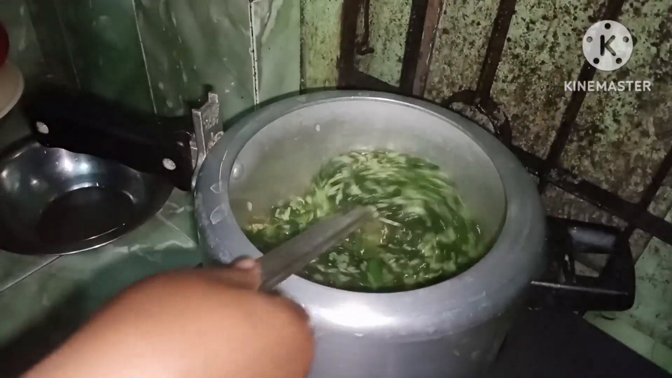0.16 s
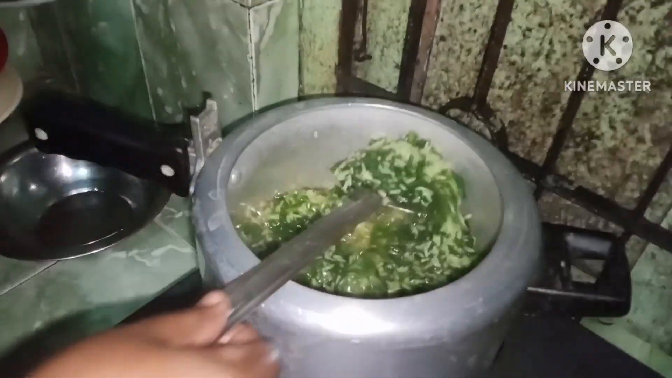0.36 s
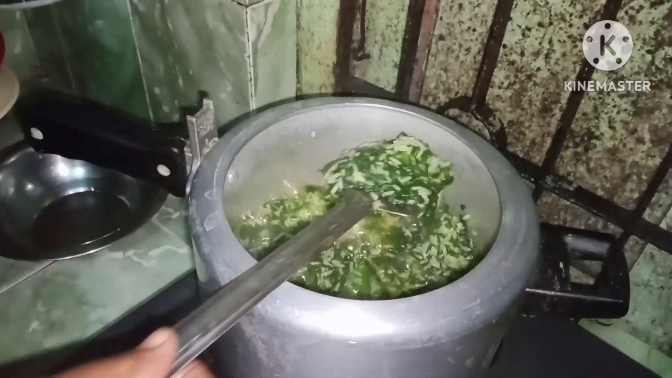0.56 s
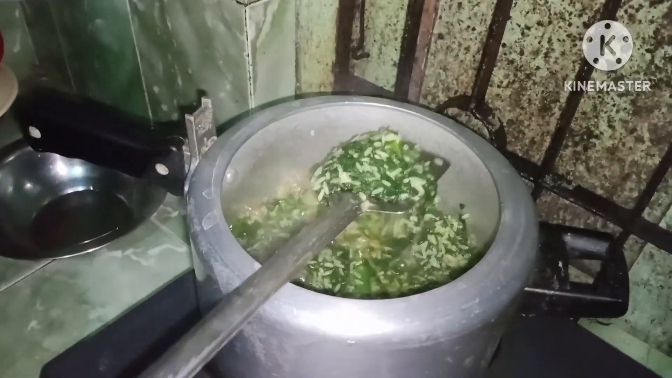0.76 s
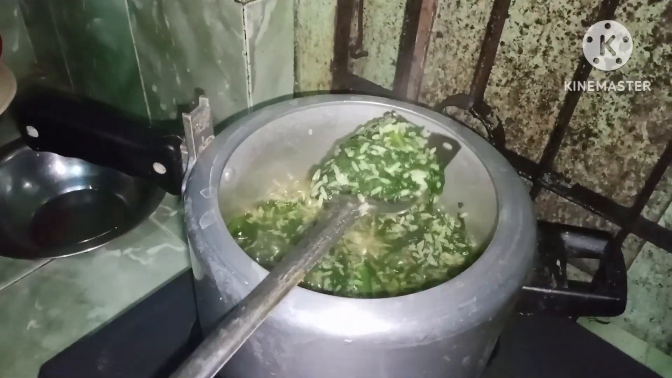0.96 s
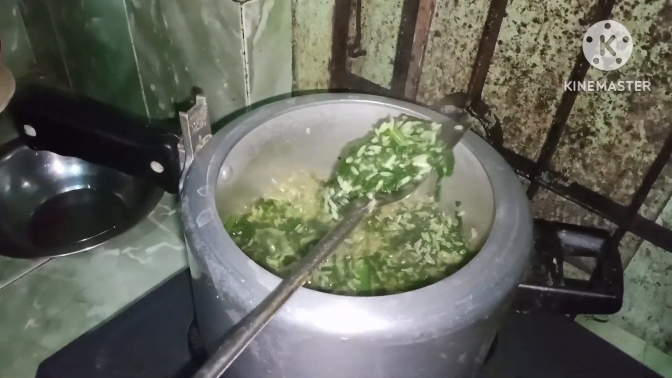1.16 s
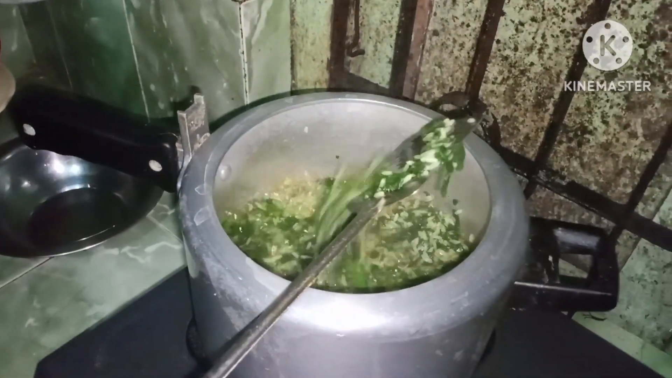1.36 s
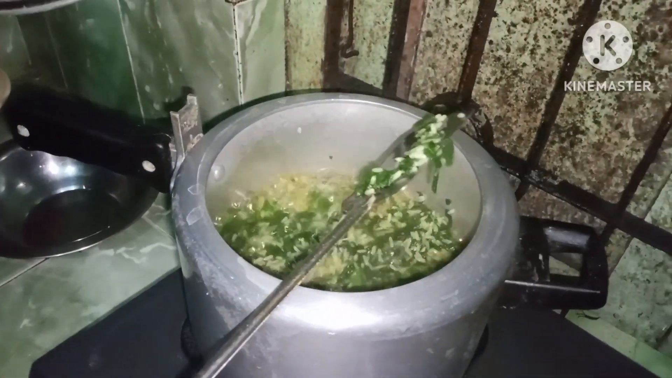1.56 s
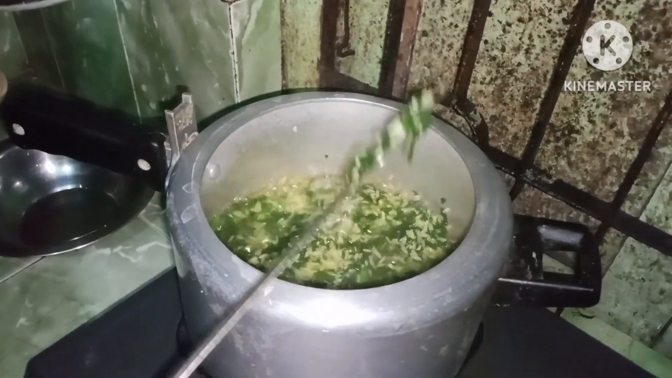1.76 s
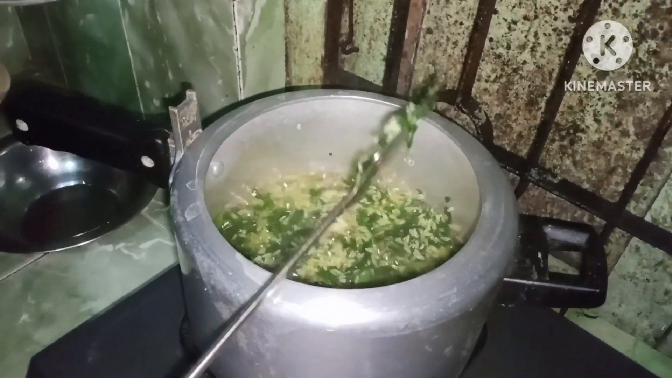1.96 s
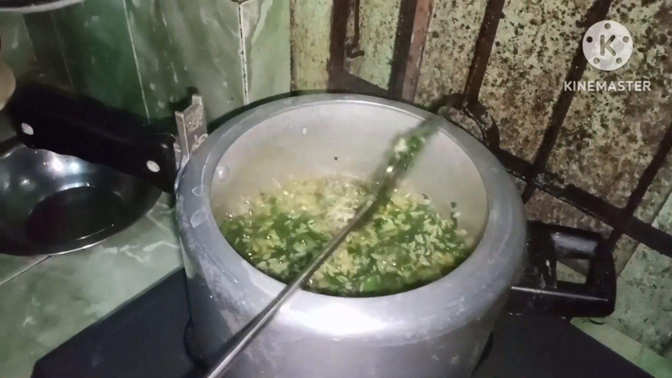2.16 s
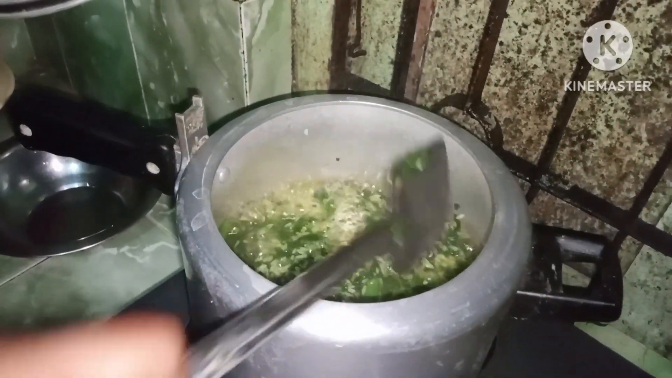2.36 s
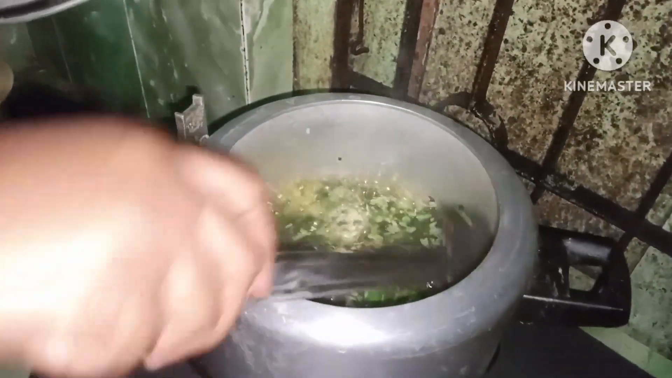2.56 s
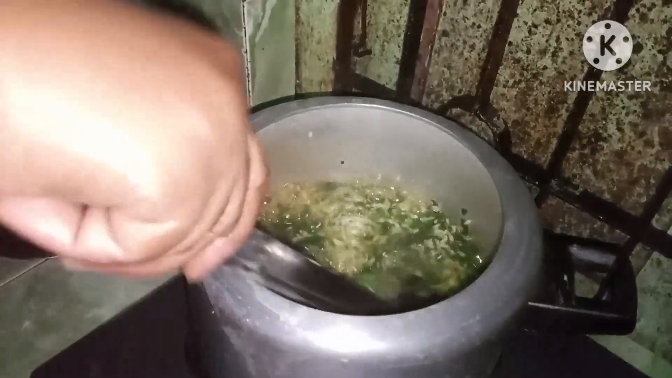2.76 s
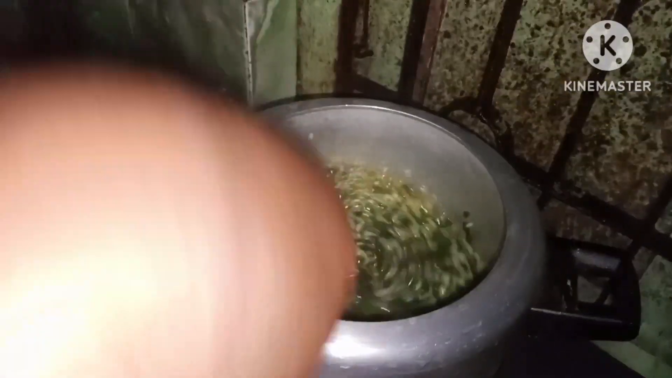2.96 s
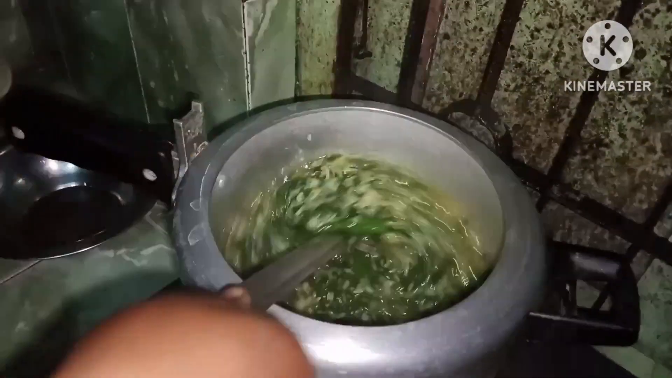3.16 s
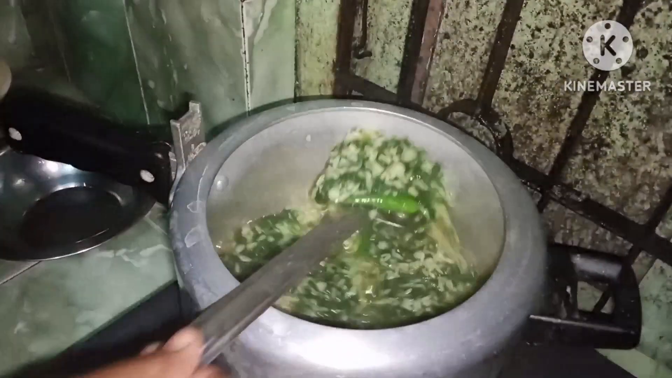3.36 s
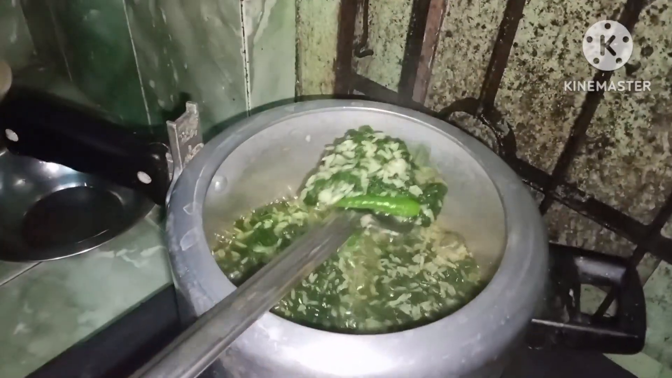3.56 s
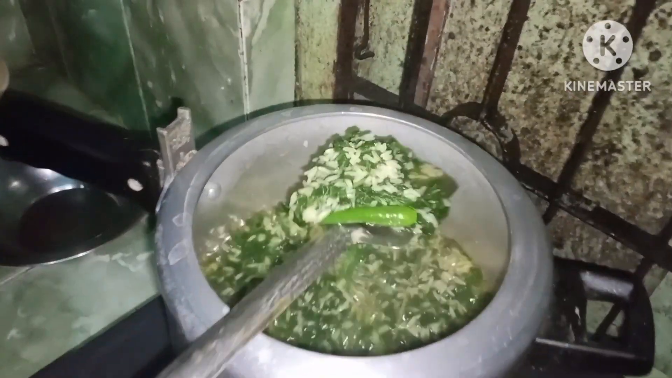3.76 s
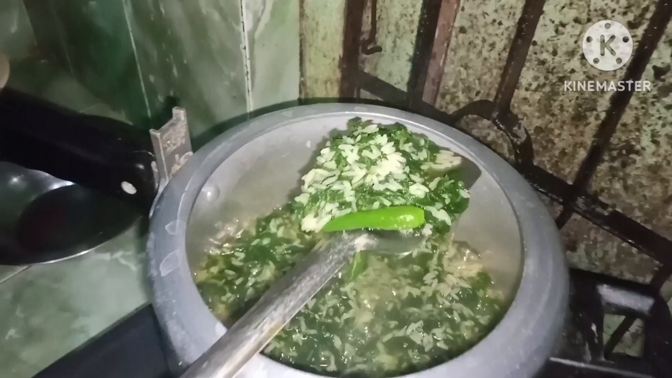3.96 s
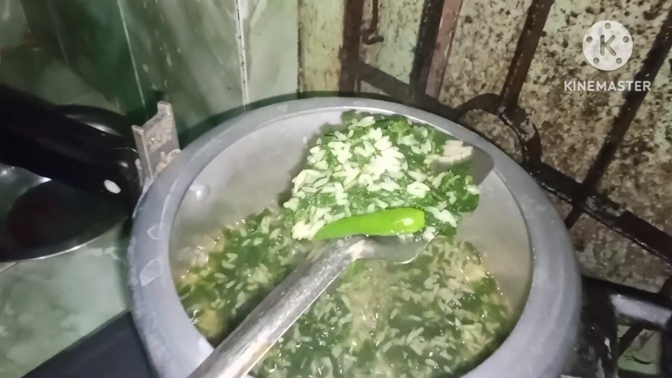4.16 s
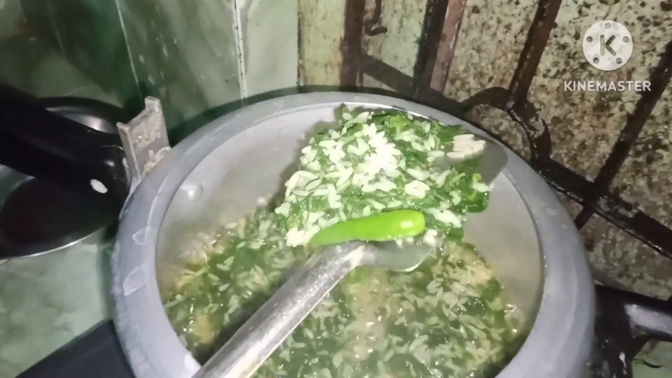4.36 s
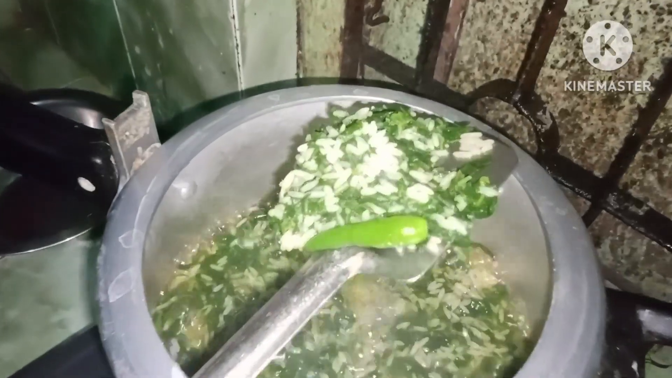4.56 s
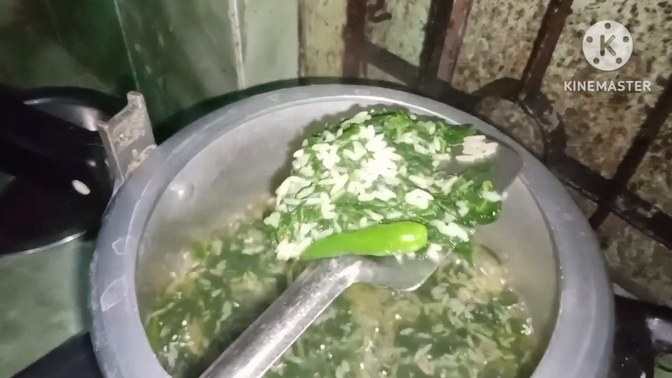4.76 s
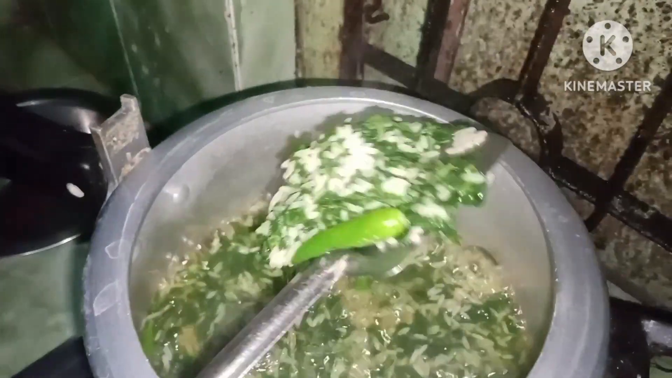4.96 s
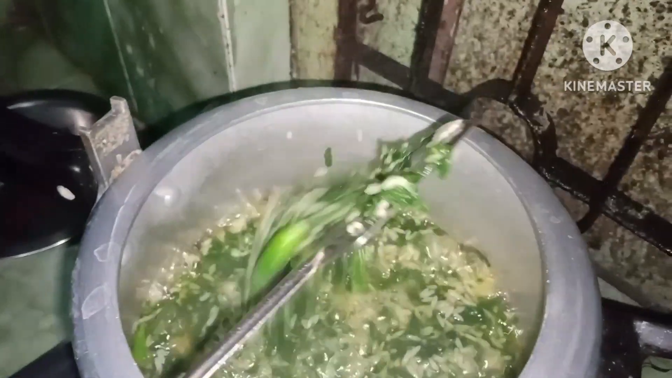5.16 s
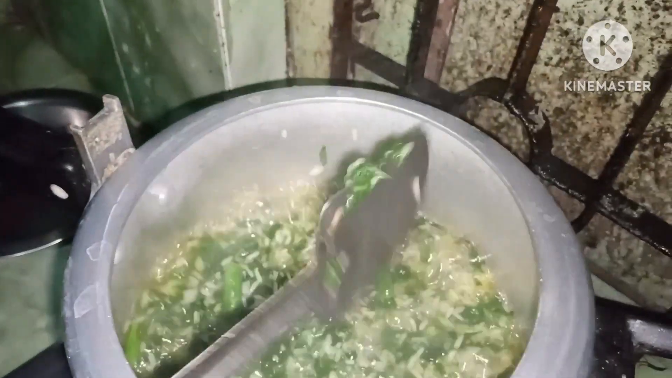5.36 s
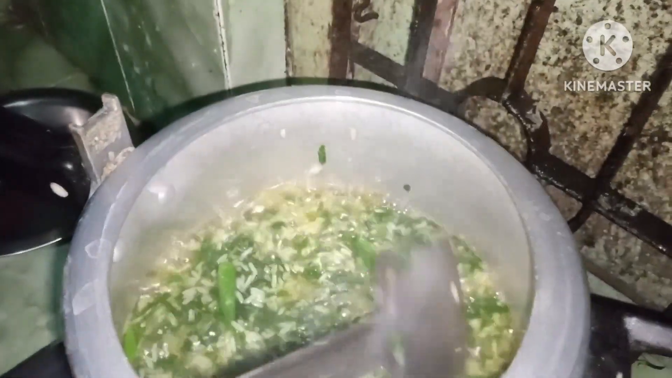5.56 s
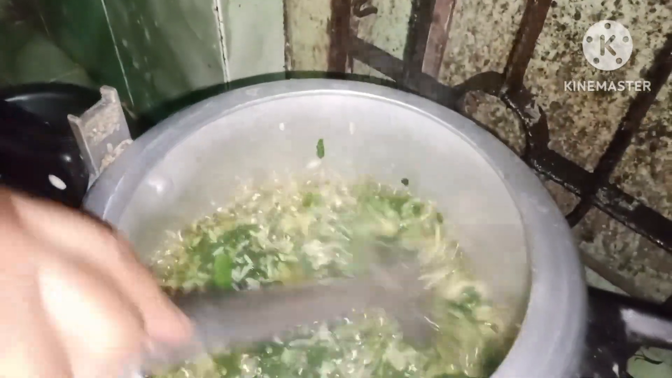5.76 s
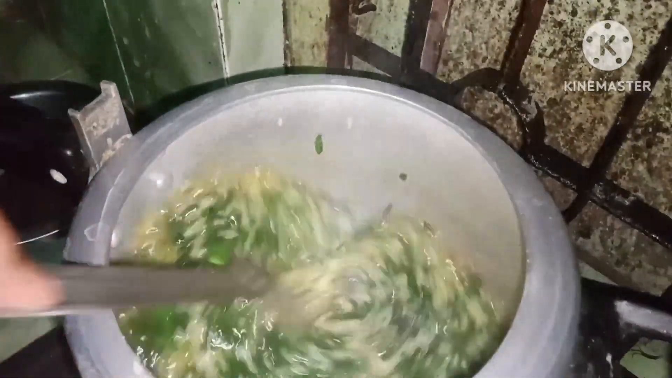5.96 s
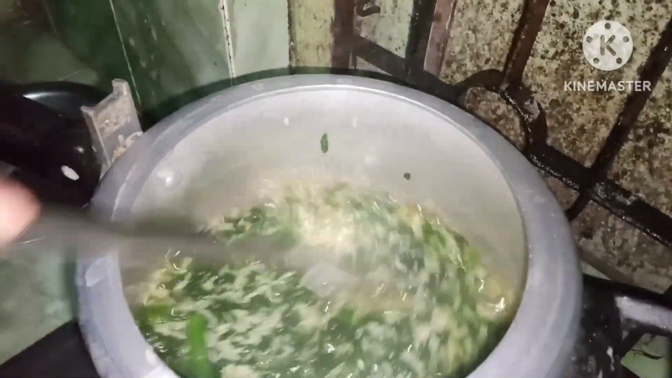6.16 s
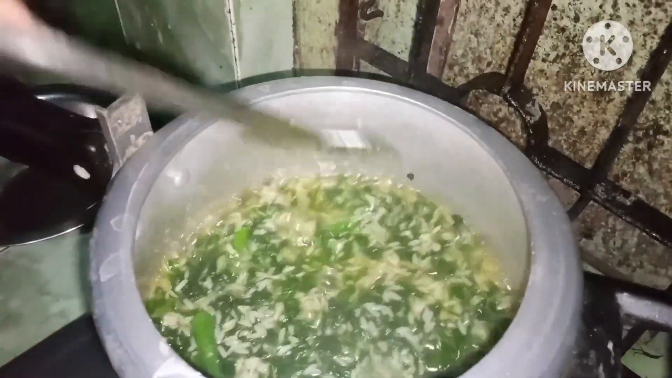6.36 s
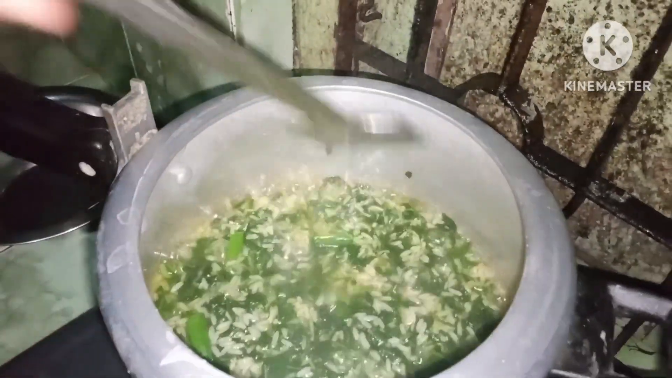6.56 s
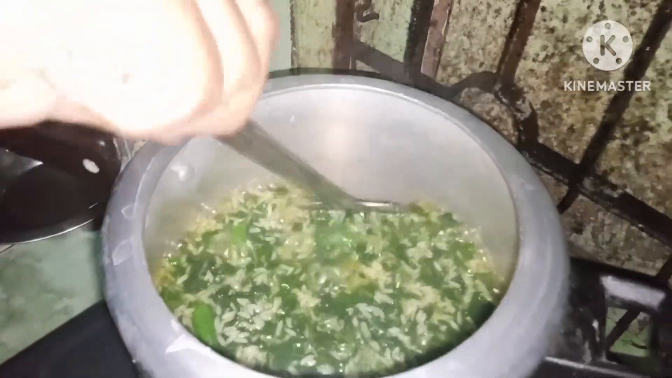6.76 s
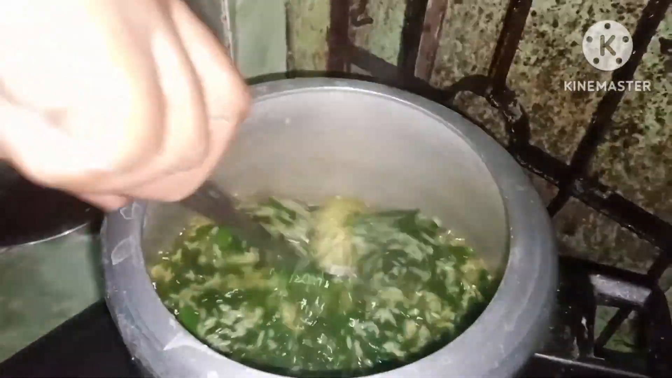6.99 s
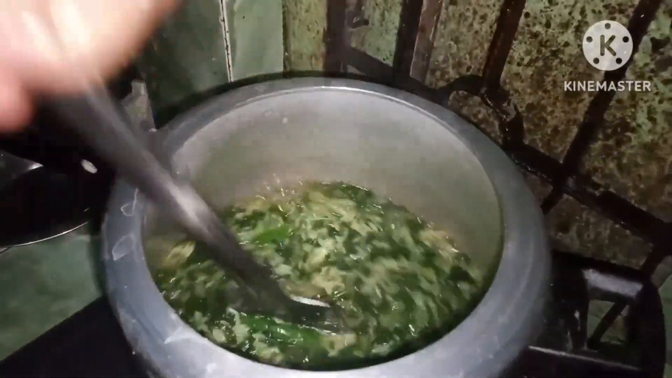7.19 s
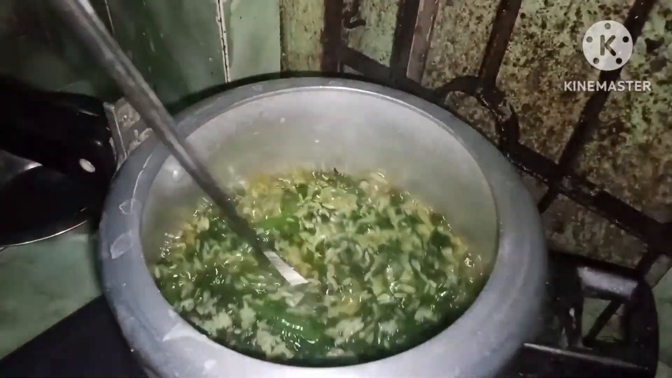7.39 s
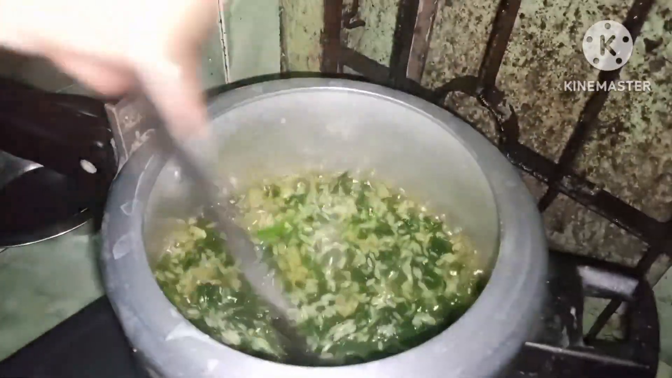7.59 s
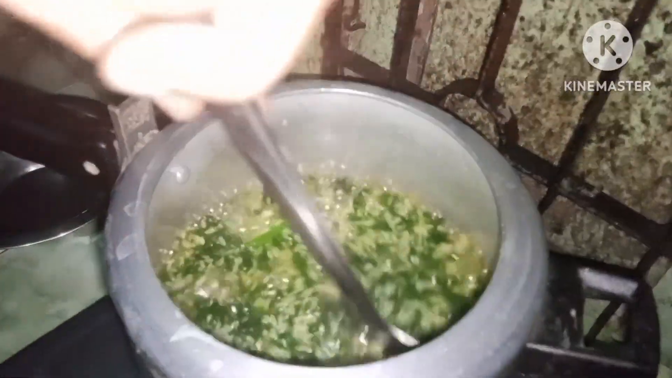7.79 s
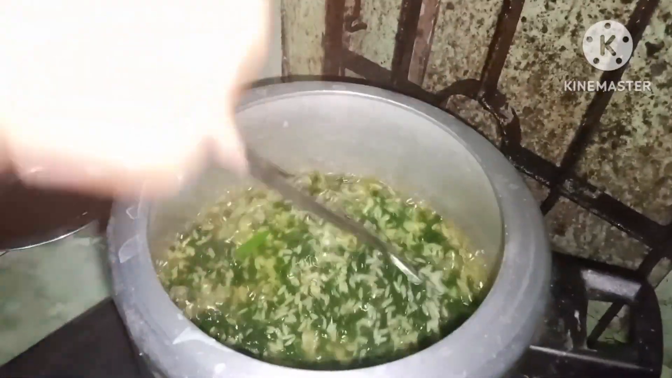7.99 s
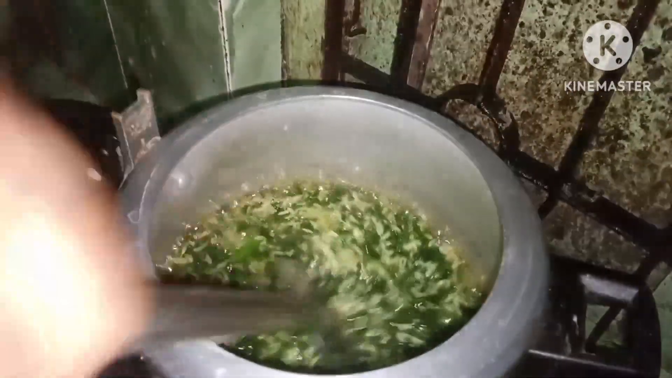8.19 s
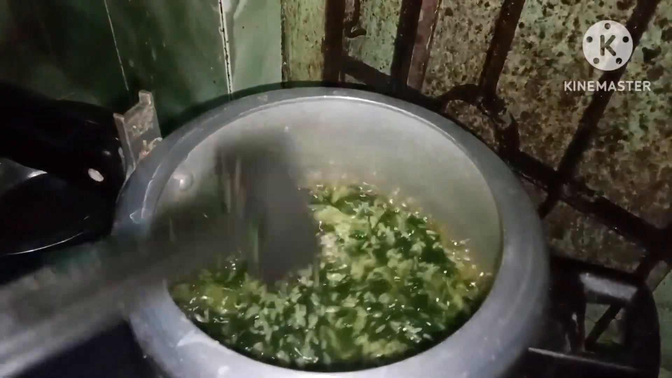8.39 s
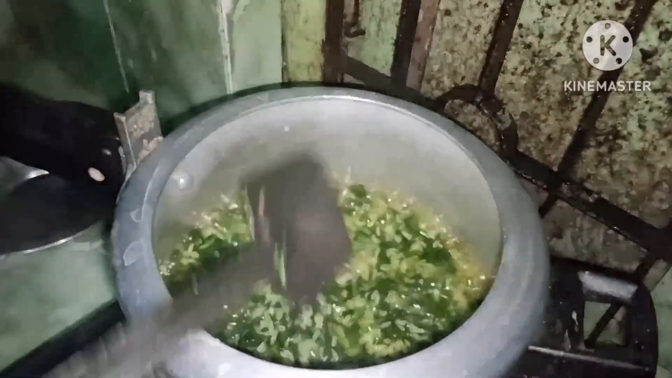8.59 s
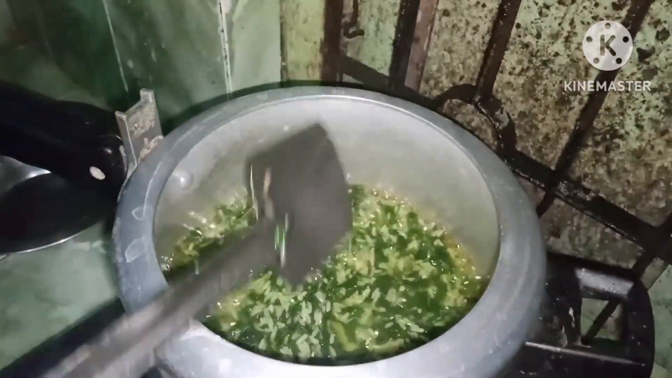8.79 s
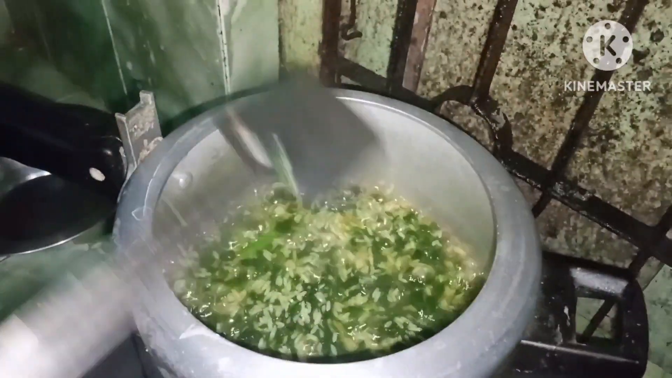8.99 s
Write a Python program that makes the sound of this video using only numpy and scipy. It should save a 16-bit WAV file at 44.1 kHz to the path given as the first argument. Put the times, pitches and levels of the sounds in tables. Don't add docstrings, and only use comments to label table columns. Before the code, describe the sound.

Thick broth simmers in a metal pot, with small wet pops and a faint even hiss, heard close on a phone with short metallic echoes. A spoon gives a low humming rub at first, later a sharp clank and rough scraping through the wet load. After a bubbling pause come lighter knocks and scrapes, then quiet boiling and one last ringing push.

```python
import sys
import numpy as np
from scipy import signal
from scipy.fft import rfft, irfft
from scipy.io import wavfile
from scipy.ndimage import uniform_filter1d

SR = 44100
rng = np.random.default_rng(int(sys.argv[2]) if len(sys.argv) > 2 else 0)


def materialize(psi):
    bounded = np.clip(np.atleast_2d(psi).T, -1, 1)
    quanta = np.round(bounded * 32767).astype(np.int16)
    wavfile.write(sys.argv[1], SR, quanta)


def voltage_ratio(level):
    return 10 ** (np.asarray(level, float) / 20)


N = 398223

# [t/s, peak level/dB, blade ring level/dB, time to fade by 60 dB/s, favoured f/Hz]
CLANK_BLOWS = [
    (2.2455, -6, -9, .1, 6150),
    (2.398, -24, -10, .09, 4657),
    (2.73, -14, -8, .12, 3712),
    (2.8, -12, -8, .1, 2600),
    (5.363, -16, -12, .08, 4657),
    (6.421, -27, -2, .08, 4081),
    (6.618, -14, -10, .09, 6395),
    (6.682, -14, -8, .07, 3712),
    (8.7385, -14, -14, .14, 4657),
]
# [f/Hz, width/Hz, level/dB]
FLOOR_HUM = [(298.2, 11.3, 0.5), (249, 62, -12.5), (152, 48, -21.5)]
# [f/Hz, width/Hz, level/dB]
WALL_DRAG = [(435.3, 21, 7), (831, 63, 3), (1227, 150, -3.5), (965, 34, -4), (542, 130, -5), (722, 89, 0.5)]
# [f/Hz, width/Hz, level/dB]
WALL_RASP = [(2015, 16, 9), (2360, 11, 7), (2680, 14, 2.5), (2970, 21, 5), (3340, 37, -5), (3707, 98, 5),
             (4020, 15, -5.5), (4390, 65, 7), (5560, 1100, -3.5)]
# [f/Hz, level per Hz/dB]
BRIGHT_EDGE = [(3240, -29.5), (5500, -9), (7080, -5.5), (8240, -11.5), (9860, -1.5), (13700, -12),
               (15100, -8), (16000, -4.5), (16500, -80.5)]
# [f/Hz, level/dB]
BLADE_NOTES = [(2030, -2), (2400, -7.5), (2600, -10), (3165, -2), (3712, 2), (4081, -3.5), (4657, -0.5),
               (5146, -20), (6150, -0.5), (6395, 1.5), (7095, -6), (7790, -16), (10300, -23),
               (11520, -26.5)]
# [f/Hz, width/Hz, level/dB]
POT_AIR = [(573, 78, -7), (1317.5, 120, 1.5), (1156, 32, -8.5), (1870, 45, -1.5), (2320, 350, -6.5),
           (2800, 250, -5.5), (3600, 400, -3.5), (4280, 110, -1)]
# [t/s, level/dB]
BOIL_LEVEL = [
    (0, -45.5),
    (0.5, -52.5),
    (1.2, -55),
    (3.1, -52),
    (4.3, -54.5),
    (5.5, -53),
    (6.4, -50.5),
    (9.03, -58),
]
# [f/Hz, level per Hz/dB]
STEAM_COLOUR = [(72, -36.5), (92, 1.5), (130, -10), (210, -8.5), (390, -10.5), (550, -11), (950, -14.5),
                (1330, -41), (1750, -30), (4200, -15.5), (5200, -22.5), (7150, -18), (8200, -35),
                (10300, -20.5), (13200, -41), (15200, -22.5)]
STEAM_DB, ECHO_DB = -61.5, -10
TOP_HZ = 15650

# [t/s, peak level/dB, bubble f/Hz]
SMALL_BLIPS = [(0.2948, -24.5, 3900), (0.739, -40, 2680), (0.9666, -36.5, 3580), (1.016, -30.5, 2680),
               (1.256, -32.5, 2590), (1.475, -26.5, 3870), (3.212, -22, 4070), (4.138, -34.5, 2720),
               (4.2195, -33.5, 2220), (4.2698, -35, 3100), (5.001, -37, 4100), (5.4, -17.5, 3010),
               (6.464, -24.5, 3600), (8.447, -33.5, 2200), (1.194, -35.5, 4130), (1.995, -37, 3830),
               (2.0733, -34, 2120), (2.0902, -31, 3550), (3.188, -32, 2360), (4.419, -36, 2150),
               (4.638, -34, 3630), (4.938, -37, 2290), (5.137, -37.5, 3340), (5.2087, -32, 2135),
               (5.551, -28, 3700), (5.673, -34.5, 2320), (5.756, -36, 3740), (6.2306, -29.5, 2390),
               (7.1072, -30.5, 2600), (7.3, -43, 2530), (7.602, -47, 2560), (7.815, -31.5, 2260),
               (8.0425, -34, 4560), (8.1889, -36, 2040), (8.345, -39.5, 2170), (8.711, -32, 3000)]
# [t/s, peak
# level/dB, bubble f/Hz, pot air level/dB, spray level/dB]
FULL_BURSTS = [(0.0777, -26, 1870, -36, -29), (0.476, -34, 8500, -37.5, -32), (2.2458, -6.5, 6180, -21, -8),
               (2.3989, -16, 4670, -29, -46), (2.5406, -39, 3800, -35.5, -32.5),
               (2.672, -24.5, 4290, -40, -38), (2.731, -18, 3700, -57, -11.5), (2.8, -9.5, 2570, -15, -21),
               (2.9044, -22.5, 1810, -15, -32.5), (3.959, -30, 3600, -38, -35.5),
               (5.3638, -13.5, 4140, -42, -12), (6.201, -47, 7100, -25, -22.5),
               (6.35, -31, 3500, -31.5, -47), (6.4225, -11.5, 4280, -29, -60),
               (6.6184, -26, 6100, -38, -14.5), (6.6831, -15.5, 3280, -54, -10.5),
               (7.5103, -17, 3760, -30, -18.5), (8.7391, -21.5, 4250, -35, -12)]
# [t/s, peak level/dB, bubble f/Hz, spray level/dB]
SPRAY_SPLASHES = [(0.2394, -24.5, 3500, -32.5), (0.8953, -28, 11900, -32.5), (1.5796, -18, 4280, -27),
                  (1.6058, -16, 5400, -19), (1.6516, -20.5, 7000, -23), (2.001, -36, 6700, -38),
                  (2.974, -14, 4300, -16), (3.332, -32, 5560, -29.5), (3.744, -28.5, 4420, -28),
                  (3.866, -33.5, 3600, -40.5), (4.3912, -42, 4220, -34), (4.516, -27, 4800, -33.5),
                  (5.5746, -23.5, 3530, -30.5), (5.82, -21, 3720, -29), (6.0302, -26, 2980, -34),
                  (6.1547, -27.5, 3800, -27.5), (7.026, -24.5, 5700, -33), (7.4744, -36, 7600, -21),
                  (7.7488, -17, 4300, -25.5), (8.406, -33.5, 9150, -40), (1.405, -42, 4100, -52),
                  (4.424, -55, 9000, -38.5), (6.0383, -33, 10100, -49), (6.051, -40, 9600, -24.5),
                  (6.271, -52, 10300, -39)]
# [t/s, peak level/dB, bubble f/Hz, pot air level/dB]
DEEP_BURSTS = [(1.214, -30.5, 3970, -54), (1.3817, -34, 1990, -39), (2.02, -29, 3340, -36.5),
               (2.1668, -21, 3340, -28.5), (3.225, -20.5, 2040, -57), (3.4235, -28.5, 3600, -43),
               (3.883, -23.5, 3600, -35), (4.004, -30, 3060, -40), (4.0226, -22.5, 3340, -24),
               (5.262, -32, 1874, -21.5), (5.646, -25, 2440, -48), (6.391, -27.5, 3600, -36),
               (6.482, -30.5, 1920, -26.5), (6.503, -18.5, 3900, -39), (7.3192, -21.5, 2360, -48),
               (7.367, -27, 4060, -41), (7.396, -30, 1770, -27.5), (7.45, -25.5, 3140, -32),
               (7.7383, -31, 3080, -36.5), (8.544, -45, 2870, -32), (8.557, -22.5, 2130, -24),
               (9.02, -30, 2200, -30)]
# [t/s, pot air level/dB]
LEAF_GULPS = [(3.731, -37), (5.055, -38.5), (5.5408, -29.5), (5.852, -33.5), (6.021, -36), (6.145, -31.5),
              (6.841, -24.5), (7.0534, -42), (7.222, -31), (8.319, -36), (8.969, -25.5)]
SPLASH_AIR_DB, BURST_SPRAY_DB, BLIP_AIR_DB, BLIP_SPRAY_DB = -25, -52, -50, -31
GULP_PEAK_DB, GULP_SPRAY_DB, GULP_HZ = -40, -51, 2040

# [hardest t/s, build-up t/s, let-go t/s, rasp level/dB, bright edge level/dB]
WALL_SCRAPES = [(0.098, 0.075, 0.12, -37, -48), (0.25, 1, 0.3, -50, -59.5),
                (2.246, 0.0032, 0.11, -29.5, -38.5), (2.299, 0.035, 0.046, -33.5, -41.5),
                (2.4, 0.14, 0.092, -45, -62), (2.553, 0.089, 0.023, -50.5, -58),
                (2.771, 0.01, 0.019, -28.5, -37), (2.811, 0.013, 0.23, -35.5, -51),
                (2.914, 0.053, 0.25, -29, -40), (3.012, 0.086, 0.12, -25.5, -29.5),
                (3.085, 0.16, 0.067, -27, -35.5), (5.4, .04, 0.47, -52.5, -69),
                (5.58, 0.034, 0.036, -40, -50), (6.033, 0.011, 0.13, -39.5, -54),
                (3.16, 0.042, 0.16, -44, -59), (6.63, 0.011, 0.041, -33, -34.5),
                (6.741, 0.072, 0.093, -35, -45), (6.789, 0.086, 0.031, -30.5, -36),
                (6.89, 0.18, 0.04, -36.5, -40.5), (7.039, 0.013, 0.11, -41.5, -57),
                (7.121, 0.056, 0.1, -39.5, -55), (8.78, 0.041, 0.055, -42, -51.5)]
# [hardest t/s, build-up t/s, let-go t/s, wet drag level/dB, hum level/dB]
LOAD_PUSHES = [(0.099, 0.035, 0.08, -29.5, -28.5), (0.16, 0.17, 0.17, -41.5, -37.5),
               (0.36, 0.05, 0.065, -47, -46), (2.25, 0.0073, 0.16, -63, -35),
               (2.3, 0.024, 0.07, -39, -35.5), (2.37, 0.043, 0.07, -44, -42.5),
               (2.48, 0.022, 0.17, -56, -38), (2.552, 0.087, 0.073, -54.5, -33.5),
               (2.811, 0.013, 0.33, -34.5, -38.5), (2.906, 0.0044, 0.1, -29.5, -30.5),
               (3.07, 0.38, 0.15, -33, -40), (3.2, 0.13, 0.12, -47.5, -46.5),
               (3.401, 0.036, 0.048, -49, -46.5), (5.4, 0.022, 0.037, -42.5, -48),
               (5.6, .14, 0.095, -52.5, -34.5), (6.035, 0.025, 0.4, -50.5, -56.5),
               (6.741, 0.044, 0.044, -57, -73), (7.059, 0.028, 0.12, -36.5, -40.5),
               (8.57, 0.026, 0.51, -53, -71), (8.744, 0.0047, 0.12, -39, -32),
               (8.799, 0.042, 0.042, -34.5, -29.5)]
SPAN_DB, LIFTED_DB = 20, -80
GURGLE_DB, SLOSH_DB, SLOSH_S = -72.5, -18, 0.11

# [t/s, peak level/dB]
SLOW_BURPS = [
    (0.328, -39.5),
    (1.055, -48),
    (3.551, -43.5),
    (3.668, -46),
    (4.292, -50),
    (5.177, -43.5),
    (5.327, -46.5),
    (8.584, -46),
]
BURP_S, BURP_DB = 0.013, 0

# [loudest t/s, build-up t/s, let-go t/s, f/Hz, level/dB]
WALL_SINGS = [(0.093, 0.028, 0.055, 5700, -42), (0.093, 0.02, 0.07, 2080, -39),
              (0.1, 0.037, 0.044, 1273, -35), (0.14, 0.083, 0.11, 421, -28),
              (2.253, 0.029, 0.24, 1940, -40.5), (2.55, 0.043, 0.035, 3725, -50.5),
              (2.56, 0.018, 0.057, 1419, -46), (2.737, 0.013, 0.048, 2364, -37.5),
              (2.77, 0.043, 0.019, 3770, -33), (2.807, 0.014, 0.084, 1220, -38),
              (2.913, 0.044, 0.06, 540, -31), (2.93, 0.091, 0.035, 4800, -44),
              (2.997, 0.043, 0.22, 1420, -35.5), (3.013, 0.045, 0.049, 6965, -35),
              (3.02, 0.048, 0.11, 3290, -34), (3.02, 0.065, 0.038, 4030, -32.5),
              (3.033, 0.16, 0.14, 5990, -37.5), (3.053, 0.02, 0.073, 1166, -29.5),
              (3.057, 0.15, 0.075, 3620, -40), (5.407, 0.083, 0.067, 527, -44.5),
              (5.567, 0.028, 0.039, 3840, -49), (6.03, 0.017, 0.055, 1350, -43),
              (6.08, 0.034, 0.058, 3649, -43), (6.357, 0.022, 0.17, 1323, -46),
              (2.29, 0.02, 0.066, 6230, -35), (6.66, 0.052, 0.17, 847, -51), (6.74, 0.048, 0.054, 432, -46),
              (6.787, 0.055, 0.065, 3540, -35.5), (6.79, 0.035, 0.033, 2006, -34.5),
              (6.793, 0.024, 0.061, 2740, -32), (8.755, 0.015, 0.097, 4080, -35),
              (7.06, 0.031, 0.046, 1226, -36.5), (7.067, 0.034, 0.031, 810, -54)]
# [loudest t/s, build-up t/s, let-go t/s, f/Hz, level/dB]
BLADE_SLIDES = [
    (2.54, 0.062, 0.02, 5900, -42.5),
    (2.545, .03, 0.03, 2800, -47),
    (2.5, 0.1, .1, 1200, -54),
    (5.58, 0.063, 0.058, 6150, -44.5),
    (11, .03, 0.054, 5900, -51),
]
# [loudest t/s, let-go t/s, f/Hz, level/dB]
AIR_NOTES = [(0.563, 0.06, 549, -52), (0.89, 0.051, 1375, -53), (1.134, 0.11, 1314, -48.5),
             (1.213, 0.1, 4210, -55), (1.383, 0.062, 1285, -49), (1.599, 0.038, 1207, -49.5),
             (1.907, 0.029, 567, -49), (2.187, 0.048, 550, -55), (3.407, 0.035, 538, -47.5),
             (3.897, 0.15, 1334, -49), (4.393, 0.052, 582, -54), (4.476, 0.091, 1354, -72),
             (4.637, 0.017, 1320, -50), (4.92, 0.055, 1290, -50), (5.063, 0.023, 647, -47.5),
             (5.267, 0.055, 524, -47.5), (7.807, 0.057, 1366, -50), (7.83, 0.025, 1210, -50),
             (8.323, 0.051, 1164, -56)]
# [t/s, level/dB]
STEAM_THUMPS = [(0.47, -66), (1.509, -67), (2.349, -60), (2.85, -57.5), (3.249, -59), (4.9, -64.5),
                (5.389, -58.5), (5.701, -57.5), (6.198, -60), (7.649, -64), (8.801, -50)]
THUMP_HZ, THUMP_RISE_S, THUMP_FALL_S = 92, 0.1, 0.22
NOTE_RISE_S, NOTE_STRETCH, NOTE_STEADY, WAVER_S = 0.042, 0.8, 1.15, 0.0098
# [loudest t/s, build-up t/s, let-go t/s, f/Hz, level/dB]
LOAD_DRONES = [
    (0.135, 0.087, 0.094, 830, -31),
    (0.31, 0.041, 0.057, 307, -40),
    (2.85, 0.11, 0.078, 432, -48),
    (2.914, 0.013, 0.033, 269, -32),
    (2.956, 0.016, 0.022, 438, -29.5),
    (3.11, 0.042, 0.24, 439.6, -42.5),
    (6.765, 0.071, .06, 716, -52),
    (6.925, 0.065, 0.086, 441, -55),
]
# [t/s, peak level/dB, f/Hz]
DROPLET_TICKS = [(0.482, -42, 8800), (1.2612, -36, 3700), (1.572, -40, 7040), (1.5947, -33, 4100),
                 (1.6012, -19.5, 4280), (2.4175, -36, 4140), (2.4661, -39, 6200), (2.6769, -32, 7440),
                 (2.9053, -21, 4200), (3.2073, -30, 4350), (3.789, -41, 10100), (3.8858, -33.5, 10800),
                 (3.9715, -35, 3800), (3.9996, -42, 10850), (4.0313, -26, 2500), (4.167, -41.5, 5350),
                 (4.3496, -44, 10700), (4.4026, -38, 9990), (4.6061, -42.5, 2320), (4.9121, -41, 7200),
                 (5.7915, -38, 1800), (5.8205, -23.5, 6350), (6.0424, -34, 10300), (6.2053, -32, 9340),
                 (6.2906, -43, 6390), (6.334, -47, 10760), (6.3595, -35, 6000), (6.413, -34, 1830),
                 (6.525, -36, 5200), (7.3887, -38, 6300), (7.3942, -27.5, 3900), (7.469, -28, 4270),
                 (7.515, -29, 10480), (7.7427, -31, 4200), (8.7935, -36, 2430), (8.882, -42, 4960)]
TICK_RISE_S, TICK_T60_S = 0.0016, 0.014


def pops():
    bubbles, air, spray = np.zeros((3, N))
    lead = .008
    u = np.arange(2600) / SR - lead
    rows = all_bursts()
    chance = rng.standard_normal((len(rows), 4, len(u)))
    snap = np.arange(len(u)) == round(lead * SR)
    for (s, peak_db, hz, air_db, spray_db), (a, b, c, d) in zip(rows, chance):
        hard = np.clip((peak_db + 40.5) / 22, .1, 1)
        slow = 3 - 2.4 * hard
        rise = np.minimum(voltage_ratio(60 * u / (0.0057 * slow)), 1)
        after = u.clip(0)
        shape = rise * (0.063 * voltage_ratio(-60 * after / 0.14) + voltage_ratio(-60 * after / (0.011 * slow)))
        tears = a * (abs(d) > 2.7) * voltage_ratio(-60 * after / 0.053) * (0.071 + 0.65 * rise)
        ticks = hard ** 2 * snap + 0.6 * tears
        tick = ring(ring(ticks, [(hz, .5 * hz, 0)]), [(1.1 * hz, .6 * hz, 0)])
        tick = band(tick, .55 * hz, 1.5 * hz)
        tone = ring(b * shape, [(hz, .05 * hz, 0), (1.22 * hz, .05 * hz, -4), (.8 * hz, .05 * hz, -4)])
        tone = ring(tone, [(hz, .4 * hz, 0)])
        bubble = 1.51 * hard * tick / abs(tick).max() + 0.65 * tone / abs(tone).max()
        add(bubbles, s - lead, voltage_ratio(peak_db) * bubble)
        add(air, s - lead, voltage_ratio(air_db) * (b * shape + 3 * ticks))
        add(spray, s - lead, voltage_ratio(spray_db) * (.8 * c * shape + .7 * ticks))
    air_notes = POT_AIR[1:3]
    gain = np.sqrt(np.mean(ring(chance[0, 0], air_notes) ** 2))
    air = band(ring(air, air_notes), 490, 3340) / gain
    spray = coloured(coloured(spray, BRIGHT_EDGE), [(10500, -1.5), (13000, -11.5)])
    spray = patched(spray, 5.84, bins=14, frames=10)
    return voltage_ratio(-3.5) * bubbles + voltage_ratio(-4.0) * air + voltage_ratio(5.5) * spray


def all_bursts():
    splashes = [(s, db, hz, spray_db + SPLASH_AIR_DB, spray_db) for s, db, hz, spray_db in SPRAY_SPLASHES]
    deep = [(s, db, hz, air_db, db + BURST_SPRAY_DB) for s, db, hz, air_db in DEEP_BURSTS]
    blips = [(s, db, hz, db + BLIP_AIR_DB, db + BLIP_SPRAY_DB) for s, db, hz in SMALL_BLIPS]
    gulps = [(s, db + GULP_PEAK_DB, GULP_HZ, db, db + GULP_SPRAY_DB) for s, db in LEAF_GULPS]
    return list(FULL_BURSTS) + splashes + deep + blips + gulps


def clanks():
    out, u = np.zeros(N), np.arange(5500) / SR
    hz, mode_db = np.transpose(BLADE_NOTES)[:, :, None]
    chance = rng.standard_normal((len(CLANK_BLOWS), 2, len(BLADE_NOTES), len(u)))
    for (s, peak_db, ring_db, t60, best_hz), (a, b) in zip(CLANK_BLOWS, chance):
        near = np.exp(-(np.log(hz / best_hz) / .04) ** 2)
        fade_db = -60 * u / t60 * (hz / 4000) ** .6 * (2.2 - 1.2 * near)
        waver = uniform_filter1d(uniform_filter1d(a + 1j * b, 330), 330)
        waver = evened(waver.view(float)).view(complex)
        swing = (0.088 + 2 * near + waver) * np.exp(2j * np.pi * hz * u)
        modes = voltage_ratio(mode_db + 2.2 * near + fade_db) * swing.real
        ringing = voltage_ratio(ring_db - 14.5) * modes.sum(0) * (1 - np.exp(-u / 0.00019))
        crack = .5 * band(a[0], 7300, 17900) * voltage_ratio(-60 * u / 0.0027)
        add(out, s, voltage_ratio(peak_db) * (ringing + crack))
    return out


def strokes():
    slips = clicks(7000, 2.7) + 0.77 * rng.standard_normal(N)
    grit = voltage_ratio(1.6 * evened(uniform_filter1d(rng.standard_normal(N), 260)))
    rasp = evened(ring(slips, WALL_RASP)) + .6 * evened(band(slips, 1900, 6000))
    rasp = band(band(rasp * grit, 1850, 6500), 1800, 7000)
    rasp = patched(rasp, 4.5, bins=2, frames=26)
    edge = patched(coloured(slips, BRIGHT_EDGE) * grit, 3.5, bins=5, frames=14)
    drag = evened(ring(slips, WALL_DRAG)) + .5 * evened(band(slips, 450, 1700))
    drag = band(patched(drag, 2.5, bins=3, frames=16), 313, 2300)
    hum = ring(ring(slips, FLOOR_HUM), [(291, 350, 0)])
    hum = hum / (.5 + evened(uniform_filter1d(abs(hum), 900)))
    gains = pressure(WALL_SCRAPES) + pressure(LOAD_PUSHES)
    return sum(gain * evened(x) for gain, x in zip(gains, (rasp, edge, drag, hum)))


def pressure(rows):
    t = np.arange(0, N / SR + .002, .001)
    s, rise, fall, *levels_db = np.transpose(rows)[:, :, None]
    off_db = -SPAN_DB * np.maximum((s - t) / abs(rise), (t - s) / abs(fall)) ** 1.4
    curves_db = [(db + off_db).max(0).clip(LIFTED_DB) for db in levels_db]
    return [np.interp(np.arange(N) / SR, t, voltage_ratio(curve)) for curve in curves_db]


def sings():
    notes = [(s, NOTE_RISE_S, fall, hz, db) for s, fall, hz, db in AIR_NOTES]
    thumps = [(s, THUMP_RISE_S, THUMP_FALL_S, THUMP_HZ, db) for s, db in STEAM_THUMPS]
    rows = list(WALL_SINGS) + list(BLADE_SLIDES) + list(LOAD_DRONES) + notes + thumps
    lead = .2
    out, u = np.zeros(N + SR), np.arange(18000) / SR - lead
    width = int(WAVER_S * SR) + 1
    for (s, rise, fall, hz, db), pair in zip(rows, rng.standard_normal((len(rows), 2, 1800))):
        a, b = [evened(uniform_filter1d(uniform_filter1d(np.repeat(v, 10), width), width)) for v in pair]
        off_db = -SPAN_DB * (np.maximum(-u / abs(rise), u / abs(fall)) / NOTE_STRETCH) ** 1.4
        swing = (NOTE_STEADY + .5 * (a + 1j * b)) * np.exp(2j * np.pi * hz * u)
        add(out, s + 1 - lead, voltage_ratio(db + off_db) * swing.real)
    return out[SR:]


def droplets():
    out, u = np.zeros(N), np.arange(1600) / SR - TICK_RISE_S
    fall = voltage_ratio(-60 * u / TICK_T60_S) + 0.15 * voltage_ratio(-10 * u / TICK_T60_S)
    shape = np.minimum(voltage_ratio(30 * u / TICK_RISE_S), fall)
    for (s, db, hz), puff in zip(DROPLET_TICKS, rng.standard_normal((len(DROPLET_TICKS), len(u)))):
        tick = band(puff * shape, .8 * hz, 1.25 * hz)
        add(out, s - TICK_RISE_S, voltage_ratio(db) * tick / abs(tick).max())
    return out


def burps():
    out, u = np.zeros(N), np.arange(5000) / SR / BURP_S
    for (s, db), puff in zip(SLOW_BURPS, rng.standard_normal((len(SLOW_BURPS), len(u)))):
        note = ring(ring(puff * u * np.exp(-u), POT_AIR[:1]), POT_AIR[:1])
        add(out, s, voltage_ratio(db + BURP_DB) * note / abs(note).max())
    return out


def boil():
    s, boil_db = np.transpose(BOIL_LEVEL)
    t, u = np.arange(N) / SR, np.arange(600) / SR
    surge = evened(uniform_filter1d(uniform_filter1d(rng.standard_normal(N), 500), 2400))
    every, size = clicks(600, 3.2) * voltage_ratio(3.2 * surge), rng.integers(0, 12, N)
    every = every + np.roll(every, 170) - np.roll(every, 410)
    bubbles = np.zeros(N)
    for k, hz in enumerate(np.geomspace(450, 4800, num=12)):
        bubble = np.sin(2 * np.pi * hz * u * (1 + 4.3 * u)) * np.exp(-u * hz / 1.93) * (1 - np.exp(-u / 0.0015))
        bubble = bubble / np.linalg.norm(bubble) * (hz / 1000) ** -.3
        bubbles += signal.oaconvolve(every * (size == k), bubble)[:N]
    inside = evened(patched(ring(bubbles, POT_AIR), 5.5, bins=7, frames=18))
    inside = voltage_ratio(np.interp(t, s, boil_db) - 3.0) * inside
    spits = ring(clicks(260, 3) * voltage_ratio(3 * surge), [(10500, 900, 3), (7000, 400, 0)])
    spits = ring(spits, [(9100, 5000, 0)])
    gurgle = ring(clicks(110, 3.0), [(153.7, 6.6, -0.5), (215.4, 56.0, -1.0)])
    gurgle = evened(band(gurgle, 76, 500))
    keep = np.exp(-1 / (SLOSH_S * SR))
    lingering = signal.lfilter([1 - keep], [1, -keep], pressure(LOAD_PUSHES)[1])
    slosh = voltage_ratio(GURGLE_DB) + voltage_ratio(SLOSH_DB) * lingering
    return inside + slosh * gurgle + voltage_ratio(-73) * evened(spits)


def pot(x):
    u = np.arange(6000) / SR
    tail = rng.standard_normal(len(u)) * voltage_ratio(-60 * u / 0.084) * (u > .0015)
    tail = .8 * band(tail, 80, 6000) + ring(tail, POT_AIR)
    return signal.oaconvolve(x, tail / np.linalg.norm(tail))[:N]


def steam():
    hiss = patched(coloured(rng.standard_normal(N), STEAM_COLOUR), 2.2, bins=7, frames=14)
    return voltage_ratio(STEAM_DB - 2.0) * evened(hiss)


def clicks(per_s, spread_db):
    out, at = np.zeros(N), np.flatnonzero(rng.random(N) < per_s / SR)
    sign, size = rng.random((len(at), 2)).T
    out[at] = np.sign(sign - .5) * voltage_ratio(spread_db * np.minimum(-np.log(size), 4))
    return out


def ring(x, modes):
    out = 0
    for k, (hz, width, db) in enumerate(modes):
        out = out + (-1) ** k * voltage_ratio(db) * signal.lfilter(*signal.iirpeak(hz, hz / width, SR), x)
    return out


def patched(x, depth_db, bins, frames):
    z = signal.stft(x, nperseg=512, noverlap=384)[2]
    field = uniform_filter1d(uniform_filter1d(rng.standard_normal(z.shape), bins, 0), frames, 1)
    return signal.istft(z * voltage_ratio(depth_db * evened(field)), nperseg=512, noverlap=384)[1][:len(x)]


def coloured(x, points):
    return irfft(rfft(x) * voltage_ratio(read(points, np.fft.rfftfreq(len(x), 1 / SR))), len(x))


def read(points, hz):
    f, value = np.transpose(points)
    return np.interp(np.log(hz + 1), np.log(f + 1), value)


def band(x, lo_hz, hi_hz):
    return signal.sosfilt(signal.butter(3, [lo_hz, hi_hz], "band", fs=SR, output="sos"), x)


def evened(x):
    return x / np.sqrt(np.mean(x ** 2) + 1e-20)


def add(mix, s, sound):
    part = mix[round(s * SR):][:len(sound)]
    part += sound[:len(part)]


def scene():
    near = pops() + clanks() + boil() + burps()
    return (near + voltage_ratio(ECHO_DB) * pot(near) + strokes() + steam() + sings() + droplets())[None]


def band_limit(x):
    return signal.sosfilt(signal.butter(12, 16810, fs=SR, output="sos"), x)


def record(dry):
    rounded = np.tanh(2 * dry) / 2
    cut = signal.sosfilt(signal.butter(2, 55, "high", fs=SR, output="sos"), rounded)
    lowpass = signal.firwin(301, TOP_HZ, window=("kaiser", 5), fs=SR)
    below = signal.oaconvolve(cut, lowpass[None], "same")
    return band_limit(below + voltage_ratio(-28.0) * (cut - below))


dry = scene()
out = record(dry)
materialize(out)
```